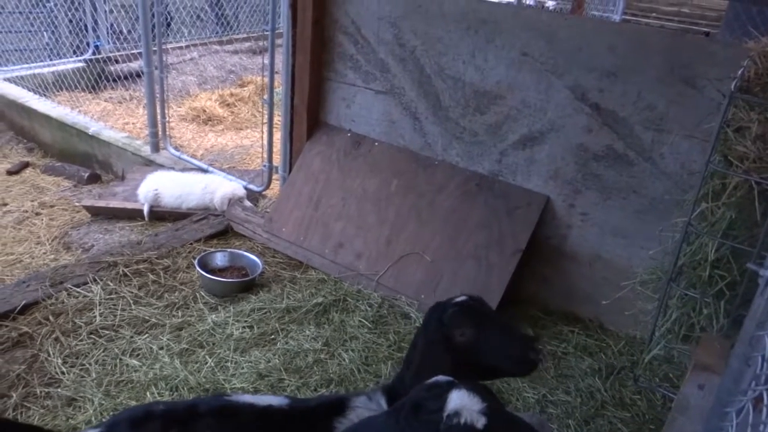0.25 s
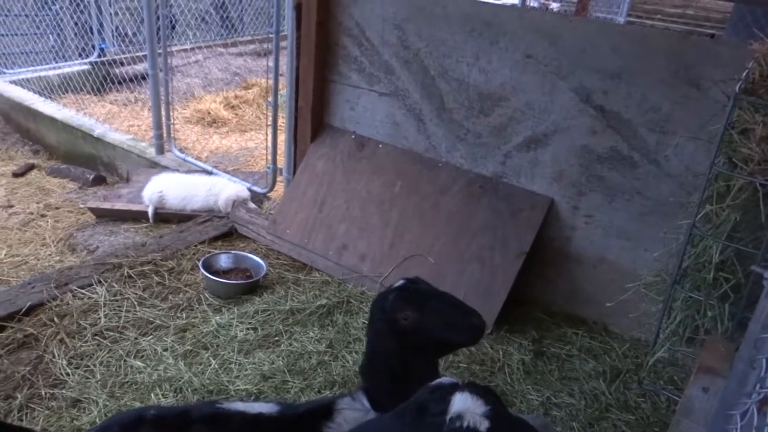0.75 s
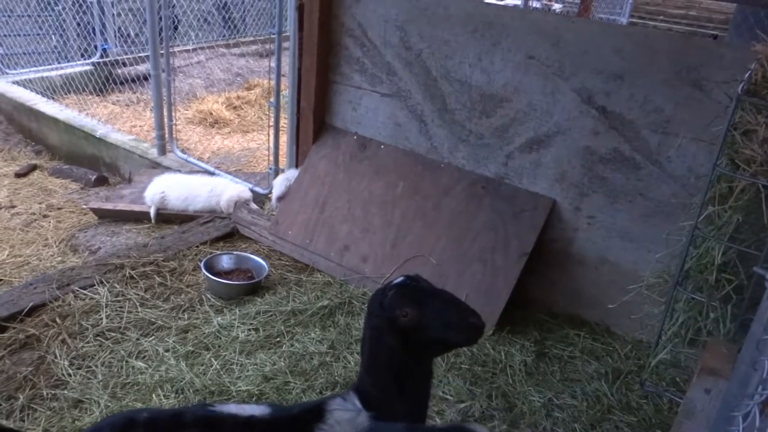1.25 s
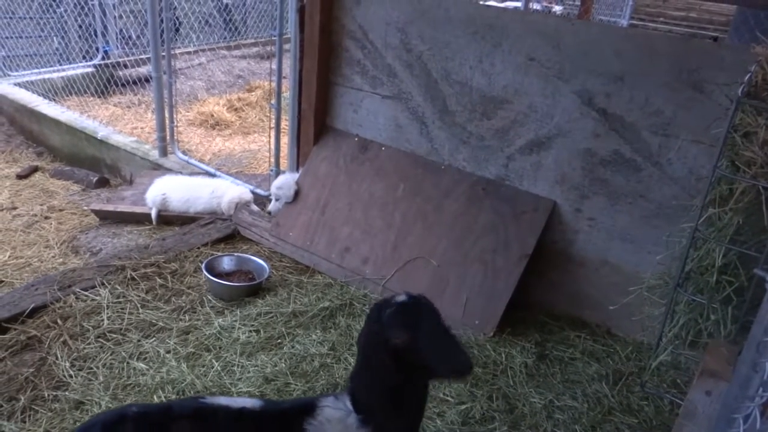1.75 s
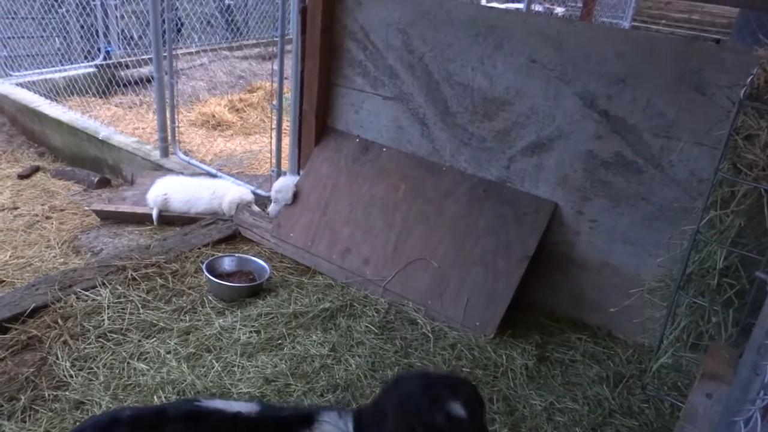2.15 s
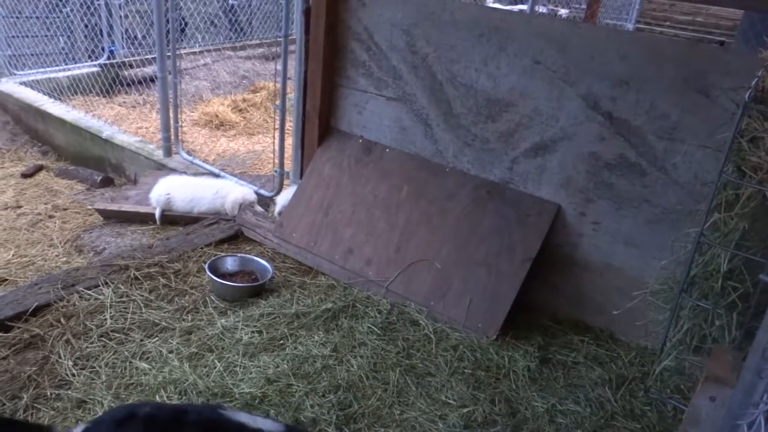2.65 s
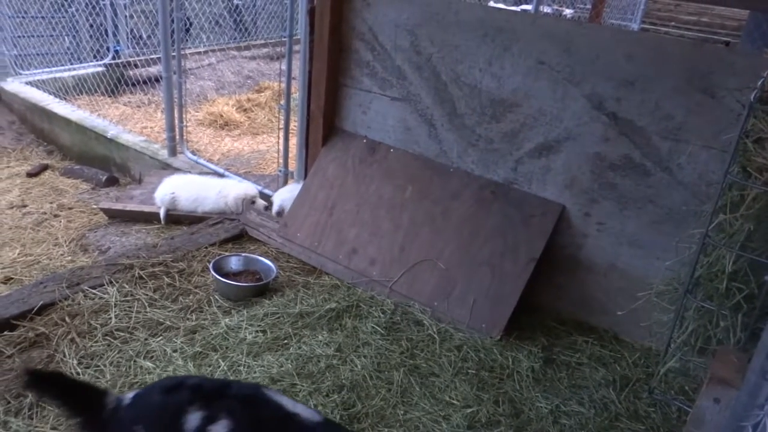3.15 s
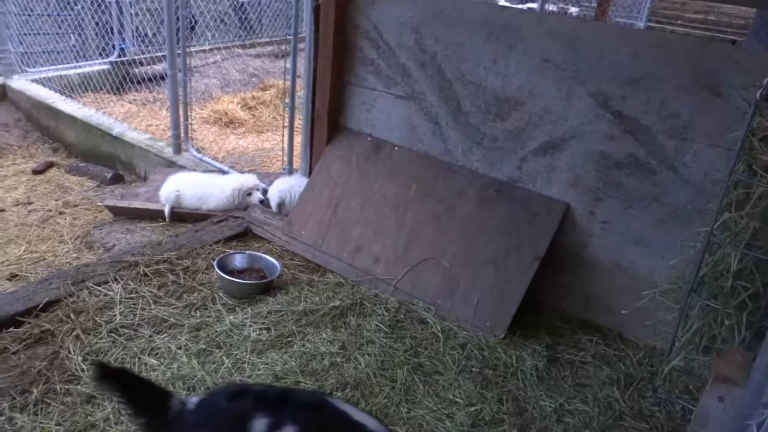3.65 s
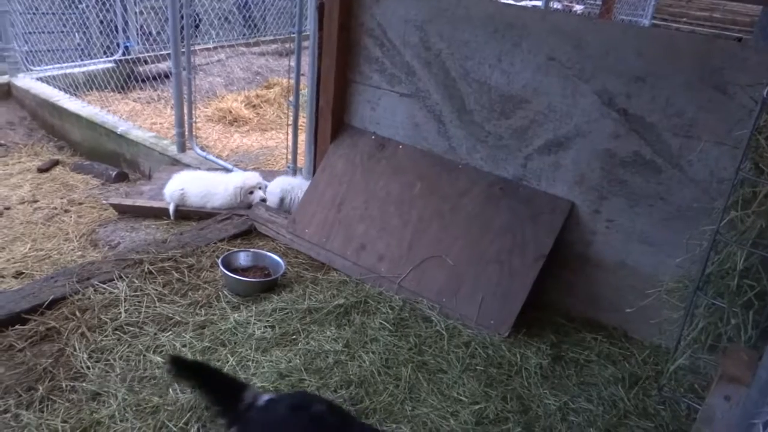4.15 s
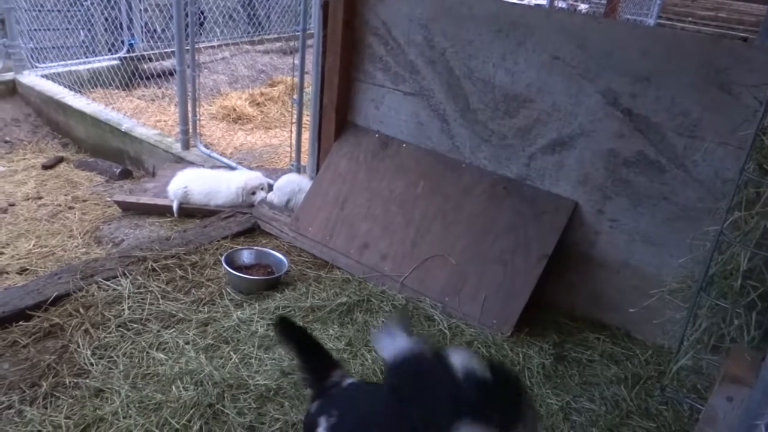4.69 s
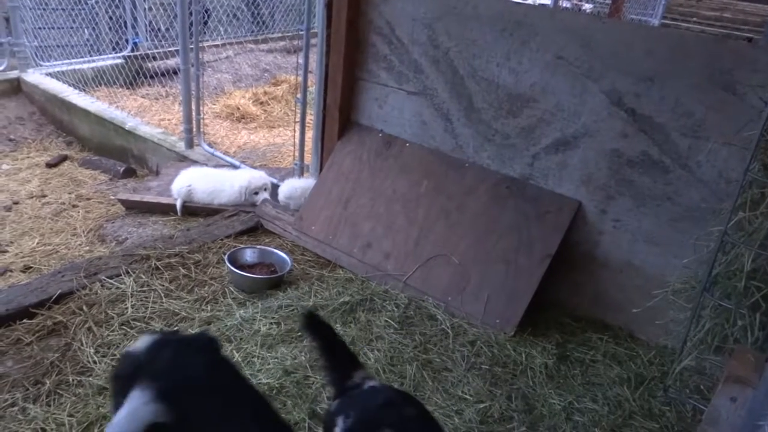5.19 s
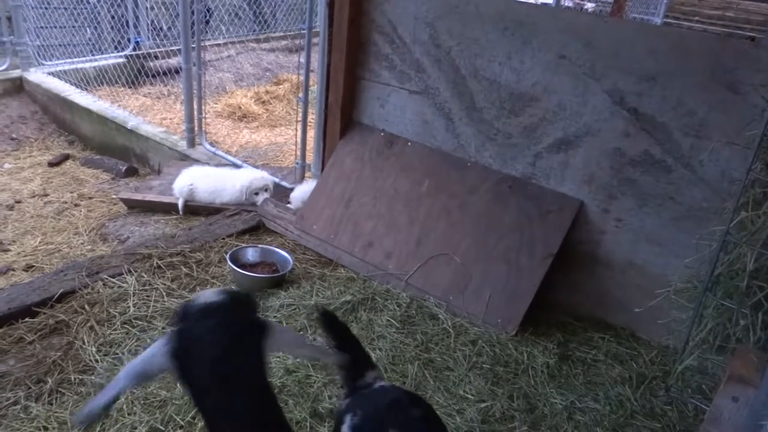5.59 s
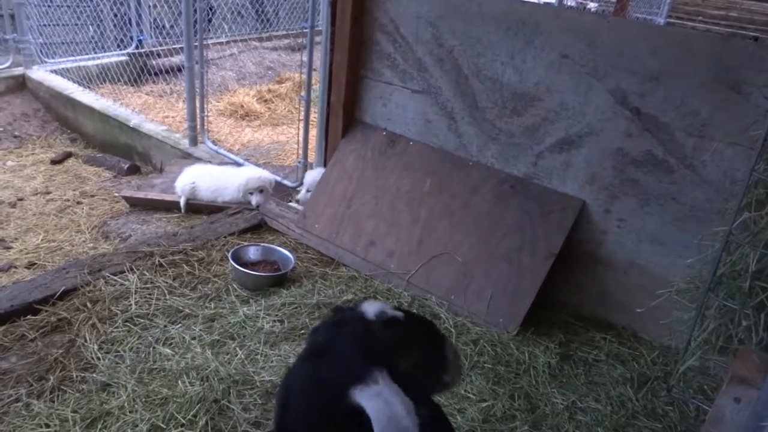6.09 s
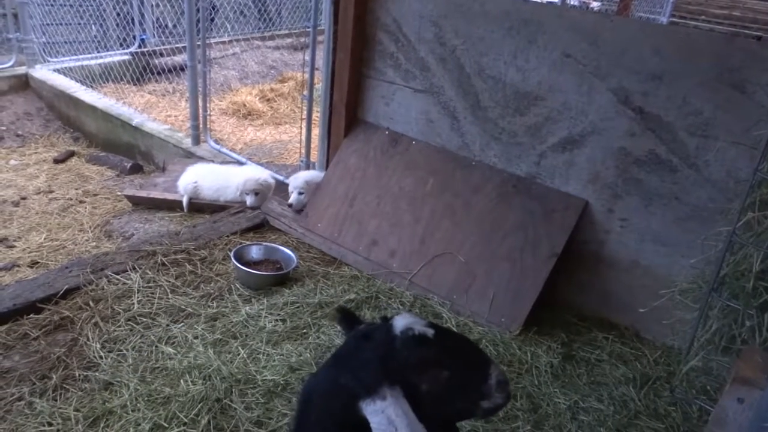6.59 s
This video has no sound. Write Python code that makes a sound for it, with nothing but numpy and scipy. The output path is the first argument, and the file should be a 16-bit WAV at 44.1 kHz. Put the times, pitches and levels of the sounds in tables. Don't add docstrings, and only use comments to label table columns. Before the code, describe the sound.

Quiet rustling bedding and hissing air lead into a muted puppy woof, then a burst of three raspy, breathy barks. Feet scuff the straw, metal clinks lightly, and the puppy barks twice again. One goat bleats, its voice cracking and falling at the end. Faint animal murmurs and short wooden-barn echoes surround it all, picked up in stereo by a small microphone with dull top end.

```python
import sys
import numpy as np
from scipy import signal
from scipy.fft import rfft, irfft, next_fast_len
from scipy.io import wavfile
from scipy.ndimage import uniform_filter1d

SR = 44100
rng = np.random.default_rng(int(sys.argv[2]) if len(sys.argv) > 2 else 0)


def materialize(psi):
    bounded = np.clip(np.atleast_2d(psi).T, -1, 1)
    quanta = np.round(bounded * 32767).astype(np.int16)
    wavfile.write(sys.argv[1], SR, quanta)


def natural_amplitude(level_db):
    exponent = np.asarray(level_db, float) / 20
    return 10 ** exponent


N = 301203

# t/s, depth/dB, half-width/s
CATCHES = [(2.183, 8, 0.0042), (2.206, 7, 0.0012), (2.362, 21, 0.0037), (2.645, 5, 0.0022),
           (2.707, 21, 0.0034), (4.146, 22, 0.0031), (4.168, 18, 0.01), (4.24, 12, 0.0042),
           (4.44, 20, 0.012), (4.53, 22, 0.0063)]
# f/Hz, width/Hz, level/dB
MOUTH = [(509, 30, -1), (574, 20, -0.5), (631.3, 15, 0), (685.5, 18, 0.5), (780, 50, -3), (930, 40, -11)]
RASP = [(1035, 30, 2.5), (1130, 45, 4), (1310, 60, -7), (950, 170, -8), (1750, 450, -6)]
CHEST = [(245, 46, -7), (293, 31, -0.5), (367.4, 15, 4.5)]
# f/Hz, width/Hz, level/dB
EDGE = [(1530, 110, 9), (1830, 40, 8.5), (2056, 27, 6), (2515, 100, 0.5), (2650, 260, -4), (3240, 64, -3.5),
        (3430, 49, -9), (4710, 76, -1), (5090, 350, -4.5), (6750, 640, -2.5)]


def puppy():
    hz, whistle_hz, (throat_db, mouth_db, rasp_db, chest_db) = bark_controls()
    phase = wavering(hz, jitter=0.0258, rate=38.9)
    voiced = np.clip((throat_db + 35.5) / 14, .1, 1)

    tone = np.sqrt(2) * np.sin(phase) * natural_amplitude(1.04 * drift(26))
    hoarse = resonate(rng.standard_normal(N), [(378.0, 96.5, -4.5), (424.8, 58, 0), (468.0, 33.4, -7.5)])
    throat = 0.83 * voiced * tone + (.95 - 0.59 * voiced) * hoarse
    voice = natural_amplitude(throat_db - 1.0 - dips_db(CATCHES)) * throat

    puffs = (1 + .6 * np.cos(phase)) * natural_amplitude(2 * drift(90))
    air = rng.standard_normal((3, N)) * puffs
    whistle_flutter_db = np.clip(4.0 * drift(25), -20, 4)
    whistle = np.sqrt(2) * np.sin(wavering(whistle_hz, jitter=.02, rate=40)) * natural_amplitude(whistle_flutter_db)
    voice = voice + natural_amplitude(mouth_db - 1.5) * (resonate(air[0], MOUTH) + 0.75 * voiced * whistle)

    edge_db = .5 * (rasp_db + 27.5) - 2.0 + 1.7 * drift(26)
    rasp = resonate(air[1], RASP) + natural_amplitude(edge_db) * resonate(air[0], EDGE)
    rasp = signal.lfilter(*signal.iirnotch(4100, 3.0, SR), rasp)
    voice = voice + natural_amplitude(rasp_db - 2.3) * rasp
    voice = voice + voiced * natural_amplitude(chest_db + 2.5) * resonate(air[2], CHEST)
    return signal.sosfilt(signal.butter(4, 230, "high", fs=SR, output="sos"), voice)


# start t/s, held for/s, throat level/dB, throat f/Hz, mouth opening/dB
BARKS = [
    (.465, 0.17, -37, 399.6, -10.5),
    (2.074, .13, -12.5, 424, 1.5),
    (2.294, 0.14, -12, 431.3, -2),
    (2.586, 0.15, -11, 427.3, -4.5),
    (4.106, 0.12, -11, 427.7, -5.5),
    (4.378, 0.15, -12, 413.2, -7),
]
# level over throat/dB, share of opening, attack/s, share of hold, release/s for 20 dB
THROAT_LAW = (0.17, 0.01, 0.062, 0.93, 0.067)
MOUTH_LAW = (-9.5, 0.51, 0.06, 0.93, 0.2081)
RASP_LAW = (-14, 1.07, 0.05, 0.6138, 0.2139)
CHEST_LAW = (-23.5, -0.23, .03, 1.04, 0.82)
LINGER_DB = (-17.5, -43, -16, -18)


def bark_controls():
    start, held, db, pitch_hz, opening_db = np.transpose(BARKS)
    t = np.arange(N) / SR
    latest = np.clip(np.searchsorted(start, t) - 1, 0, None)
    since = t - start[latest]
    overshoot = 0.0501 * np.exp(-((since - 0.051) / .025) ** 2)
    hz = pitch_hz[latest] * (1 + overshoot)
    start_hz, end_hz, rise_s = 589.6, 682, .11
    whistle_hz = start_hz + (end_hz - start_hz) * np.clip(since / rise_s, 0, 1) ** 2
    levels = []
    for law, linger_db in zip((THROAT_LAW, MOUTH_LAW, RASP_LAW, CHEST_LAW), LINGER_DB):
        over_db, share, attack_s, hold, release_s = law
        part_db = db + over_db + share * opening_db
        bark_db = bursts_db(start, hold * held, part_db, attack_s, release_s)
        tail_db = bursts_db(start, held, part_db + linger_db, attack_s, release_s=0.37)
        levels.append(np.maximum(bark_db, tail_db))
    return hz, whistle_hz, levels


# t/s, f/Hz, level/dB, brightness/dB per octave
BLEAT_HIGH = [(4.805, 563, -62, -5), (4.83, 603, -51, -13), (4.87, 655.4, -46.5, -6.5),
              (4.93, 706, -49, -0.5), (5.004, 725, -45.5, 3), (5.04, 738, -46, 2), (5.126, 706, -41.5, -4),
              (5.2, 712, -36, -1.5), (5.235, 681, -41.5, -13)]
BLEAT_LOW = [(5.226, 630.6, -44, 0), (5.245, 566, -39, -2.5), (5.29, 542, -37.5, 1),
             (5.415, 519.5, -39.5, -2), (5.515, 518, -37.5, -3), (5.55, 541, -37.5, -6),
             (5.67, 533, -40.5, -9), (5.85, 536.5, -39, -8.5), (5.99, 528, -43.5, -10)]
BLEAT_END = [(6.022, 523.3, -44.5, -20), (6.056, 517, -36.5, -18.5), (6.095, 499, -41.5, -14.5),
             (6.147, 447, -48.5, -15), (6.185, 417, -57.5, -19)]
# start t/s, end t/s, breath level/dB, half-pitch share
BREAKS = [
    (5.06, 5.155, -50, .5),
    (5.13, 5.222, -58, .4),
    (5.222, 5.265, -43, .2),
    (6.07, 6.17, -59, 0),
]
# t/s, depth/dB, half-width/s
WOBBLES = [(5.376, 7, .005), (5.484, 15, .006), (5.524, 14, .005), (5.545, 10, .006)]
# f/Hz, level/dB
GOAT_MOUTH = [(520, -9.5), (720, -2), (1070, 0.2), (1570, -2.5), (2150, 0.4), (2900, -3), (3450, -16),
              (4300, -19.5)]
# f/Hz, half-width/Hz, level/dB
GOAT_NOSE = [(1037.4, 11, -15), (1336, 52, -18), (1620, 22, -4), (2083, 19.5, 11.5), (2680, 20, -10.5)]


def bleat(rows):
    gate, (hz, effort_db, bright_db) = in_time(rows, fade_s=0.018)
    phase = wavering(uniform_filter1d(hz, size=200), jitter=0.00364, rate=30.3)
    half = sum(share * window(start, end, 0.012) for start, end, db, share in BREAKS)
    skipped = half * natural_amplitude(3.8 * drift(30)) * np.cos(phase / 2)
    wobble_db = dips_db(WOBBLES)
    voice, on = np.zeros(N), gate > 0
    for k in range(8):
        partial_hz = (k + 1) * hz[on]
        mouth_db = at_hz(GOAT_MOUTH, partial_hz)
        mouth_db = mouth_db - np.clip(partial_hz - 4500, 0, None) / 30
        nose_db = sum(db * np.exp(-((partial_hz - at) / width) ** 2) for at, width, db in GOAT_NOSE)
        tilt_db = bright_db[on] * np.log2(np.maximum(partial_hz / 1070, 1))
        flutter_db = (.6 + .5 * k) * drift(22)
        level_db = (effort_db - wobble_db * (k >= 3))[on] + tilt_db + mouth_db + nose_db + 2.5
        level = natural_amplitude(uniform_filter1d(level_db, size=400) + flutter_db[on])
        level = level * (1 + skipped[on] * (k >= 2))
        voice[on] += level * np.sin((k + 1) * phase[on] + k * k)
    return gate * voice


# f/Hz, width/Hz, level/dB
BREATH = [(1730, 410, -5), (2520, 1700, 7), (2780, 2200, 6.5)]


def goat_breath():
    effort = sum(natural_amplitude(db) * window(start, end, 0.0058) for start, end, db, share in BREAKS)
    air = resonate(resonate(rng.standard_normal(N), BREATH), [(2220, 2000, 0)])
    return effort * natural_amplitude(drift(60.7)) * air


# t/s, level/dB
CLINKS = [
    (.82, -51),
    (3.865, -45.5),
    (4.008, -38),
    (4.03, -66),
]
# f/Hz, level/dB, time to fall 60 dB/s
LATCH = [(617, -9, 1), (1385, -3, 0.25), (972, -19.5, 0.2), (2680, -16, 0.06), (4500, -10.5, 0.11),
         (5330, -13, 0.075)]


def gate_metal():
    at, out = [round(s * SR) for s, db in CLINKS], np.zeros(N)
    for hz, level_db, t60 in LATCH:
        clicks = np.zeros(N)
        clicks[at] = natural_amplitude(np.array(CLINKS)[:, 1] + level_db + rng.normal(0, 1.3, len(at)))
        out += ring(clicks, hz, t60)
    return signal.sosfilt(signal.butter(2, 7000, fs=SR, output="sos"), out)


# start t/s, end t/s, f/Hz, width/Hz, level/dB
MURMURS = [(0.522, .63, 235, 32, -40.5), (0.756, .81, 610, 39, -52), (2.0, 2.07, 405, 60, -52.5),
           (2.187, 2.602, 218, 27, -44), (2.36, 3.14, 160, 23, -56), (2.748, 3.439, 438.6, 19, -51),
           (2.95, 3.398, 655, 47, -58), (3.994, 4.41, 1330, 27, -72), (4.327, 4.8, 205.7, 16, -44),
           (4.7, 5.2, 513, 260, -51.5), (0.817, 0.902, 8650, 100, -47), (.524, .64, 2170, 440, -60),
           (6.73, 6.86, 1183, 26, -64)]


def murmurs():
    out = np.zeros(N)
    for start, end, hz, width, db in MURMURS:
        swell = window(start, end, 0.0091)
        on = swell > 0
        narrow = resonate(rng.standard_normal(SR), [(hz, width, 0)])
        narrow = resonate(narrow, [(hz, 2 * width, 0)])
        out[on] += natural_amplitude(db) * swell[on] * narrow[SR - np.sum(on):]
    return out


# start t/s, held for/s, level/dB
STRAW = [(.085, .06, -61), (.28, 0.028, -57.5), (.45, 0.11, -53), (.675, 0.057, -51.5),
         (0.806, 0.11, -42.5), (.97, 0.35, -47.5), (1.533, 0.023, -47), (1.71, .03, -68), (1.85, 0.1, -55),
         (2.004, 0.066, -48.5), (2.09, 0.044, -42), (2.3, 0.1, -50.5), (2.59, 0.083, -50),
         (2.975, 0.64, -54), (2.74, 0.18, -58), (3.535, 0.049, -50), (3.63, .2, -57), (3.849, 0.06, -45.5),
         (3.968, 0.033, -44), (4.129, 0.2, -52), (4.46, 0.16, -47), (4.62, 0.25, -51), (4.95, 0.11, -62),
         (5.08, 0.37, -52.5), (5.4, 0.074, -47), (5.719, 0.045, -53.5), (6.01, 0.039, -56),
         (6.164, 0.11, -47.5), (6.33, 0.28, -50), (6.682, 0.045, -51.5)]
# f/Hz, level/dB per Hz
STRAW_COLOUR = [(1350, -45), (2300, -9.5), (2570, -6.5), (2930, -11.5), (3170, -10), (5840, -5), (8720, -2),
                (10500, -6), (11000, -31), (14400, -50.5), (22000, -120)]


def straw_crackle():
    level_db = bursts_db(*np.transpose(STRAW), attack_s=0.022, release_s=0.19)
    level_db = np.maximum(-64.5, level_db)
    straw = natural_amplitude(level_db - 0.8) * banded(STRAW_COLOUR, patchy_db=2.5, grain_db=-2.0, per_octave=3)
    return straw * natural_amplitude([[-.6], [.6]])


# start t/s, held for/s, shuffle level/dB, thud level/dB
SHUFFLE = [(.42, .3, -63, -61), (0.726, 0.21, -55, -52.5), (.9, 0.24, -58.5, -59), (1.55, 0.051, -63, -70),
           (1.99, .9, -61.5, -56.5), (2.964, 0.2, -45, -49), (3.22, 0.18, -56.5, -56),
           (3.358, 0.059, -50, -49), (3.47, 0.18, -62, -58), (3.85, 0.072, -52.5, -59),
           (3.978, 0.04, -42.5, -53.5), (4.08, 0.754, -58, -48.5), (4.95, 1.236, -56.5, -62.5),
           (6.22, .7, -62.5, -63.5)]
# f/Hz, level/dB per Hz
SHUFFLE_COLOUR = [(470, -21), (800, -6.5), (1030, 17), (1480, -8), (1840, 10.5), (2740, -5), (4000, -7.5),
                  (5200, -16), (8800, -120)]
THUD_COLOUR = [(88, -32.5), (150, -10), (281, 2), (459, -5), (592, -3), (846, -13), (1000, -28),
               (1300, -46.5), (2200, -120)]


def shuffling():
    start, held, rub_db, tread_db = np.transpose(SHUFFLE)
    attack_s, release_s = 0.042, 0.11
    rub_db = np.maximum(-69, bursts_db(start, held, rub_db, attack_s, release_s))
    thud_db = np.maximum(-66, bursts_db(start, held, tread_db, attack_s, release_s))
    rub = natural_amplitude(rub_db + 0.2) * banded(SHUFFLE_COLOUR, patchy_db=2.0, grain_db=0.5)
    thuds = natural_amplitude(thud_db + 4.5) * banded(THUD_COLOUR, patchy_db=3.5, grain_db=-0.7)
    return rub + thuds


# t/s, swell/dB, half-width/s
GUSTS = [
    (.6, 7.5, 0.037),
    (2.65, 5.5, 0.95),
    (3.33, 2, .12),
    (4.1, 4, .3),
    (4.72, 9, 0.11),
]
# f/Hz, level/dB per Hz
RUMBLE = [(12, -43.5), (20, -2.5), (54, -7.5), (124, 0), (200, -7.5), (260, -18.5), (440, -120)]
HISS = [(120, -37.5), (200, 10.5), (253, -1.5), (658, -4), (1520, -16.5), (6020, -13), (8000, -5.5),
        (11000, -19), (14300, -50), (22000, -120)]


def barn_air():
    rumble = natural_amplitude(-59 - 3.0 + dips_db(GUSTS)) * banded(RUMBLE, patchy_db=3.0, grain_db=3.0)
    hiss = natural_amplitude(-57 - 2.0) * banded(HISS, patchy_db=2.0, grain_db=0.5)
    return rumble + hiss


def barn(x):
    t60_s, wall_cut_hz = 0.27, 9000
    size = next_fast_len(N + SR)
    hz, spectrum = np.arange(size // 2 + 1) * SR / size, rfft(x, size)
    dull, out = 1 / (1 + 1j * hz / wall_cut_hz), np.zeros((2, size // 2 + 1), complex)
    for k, lag in enumerate(rng.uniform(.012, .04, 16)):
        loop = natural_amplitude(-60 * lag / t60_s) * dull * np.exp(-2j * np.pi * hz * lag)
        out[k % 2] += loop / (1 - loop) * (-1) ** (k // 2)
    return irfft(out * spectrum, size)[:, :N]


# f/Hz, likeness 0 to 1
LIKENESS = [(60, 0.96), (170, 0.96), (480, 0.8), (1340, 0.48), (3760, 0.76), (10600, 0.86)]


def banded(spectrum, patchy_db, grain_db, per_octave=2):
    low_hz, high_hz = spectrum[1][0] * .7, min(spectrum[-2][0], 12000)
    edges = np.geomspace(low_hz, high_hz, int(per_octave * np.log2(high_hz / low_hz)) + 2)
    white = rng.standard_normal((2, 2, N)) * natural_amplitude(grain_db * drift(210))
    out = 0
    for k, (low, high) in enumerate(zip(edges, edges[1:])):
        band = signal.butter(2, [low, high], "band", fs=SR, output="sos")
        mid, side = signal.sosfilt(band, white[k % 2])
        hz = np.sqrt(low * high)
        alike = np.clip(at_hz(LIKENESS, hz) - .03, 0, 1)
        gain = natural_amplitude(at_hz(spectrum, hz) + patchy_db * drift(8.5))
        out = out + gain * (np.sqrt(1 + alike) * mid + np.sqrt(1 - alike) * side * [[1], [-1]])
    return rms_one(out)


def resonate(x, peaks):
    out = 0
    for k, (hz, width, level_db) in enumerate(peaks):
        r = np.exp(-np.pi * width / SR)
        poles = [1, -2 * r * np.cos(2 * np.pi * hz / SR), r * r]
        peak = signal.lfilter([1 - r * r, 0, r * r - 1], poles, x)
        out = out + (-1) ** k * natural_amplitude(level_db) / np.sqrt(width) * peak
    return rms_one(out)


def ring(x, hz, t60):
    r, w = natural_amplitude(-60 / (t60 * SR)), 2 * np.pi * hz / SR
    return signal.lfilter([0, np.sin(w)], [1, -2 * r * np.cos(w), r * r], x + 1e-18)


def wavering(hz, jitter, rate):
    return 2 * np.pi * np.cumsum(hz * (1 + jitter * drift(rate))) / SR


def drift(rate):
    r = np.exp(-80 * np.pi * rate / SR)
    slow = signal.lfilter([1], [1, -2 * r, r * r], rng.standard_normal(N // 40 + 2002))[2000:]
    return np.interp(np.arange(N) / 40, np.arange(len(slow)), rms_one(slow))


def bursts_db(start, held, db, attack_s, release_s):
    since = np.arange(0, N + 32, 32)[:, None] / SR - start
    rise_db = 24 * np.log10(np.clip(since / attack_s, 1e-5, 1))
    fall_db = 20 * np.clip(since - held, 0, None) / release_s
    loudest = np.max(db + rise_db - fall_db, axis=1)
    return np.interp(np.arange(N) / 32, np.arange(len(loudest)), loudest)


def dips_db(table):
    t = np.arange(N) / SR
    return sum(depth_db * np.exp(-((t - s) / width) ** 2) for s, depth_db, width in table)


def window(start, end, fade_s):
    t = np.arange(N) / SR
    return np.clip(np.minimum(t - start, end - t) / fade_s, 0, 1)


def in_time(rows, fade_s):
    t, (s, *columns) = np.arange(N) / SR, np.transpose(rows)
    gate = np.clip(np.minimum(t - s[0], s[-1] - t) / fade_s + 1, 0, 1)
    return gate, [np.interp(t, s, c) for c in columns]


def at_hz(points, hz):
    point_hz, value = np.transpose(points)
    return np.interp(np.log(hz), np.log(point_hz), value)


def rms_one(x):
    return x / np.sqrt(np.mean(x ** 2) + 1e-20)


def scene():
    dog = puppy()
    goat = bleat(BLEAT_HIGH) + bleat(BLEAT_LOW + BLEAT_END) + goat_breath()
    small = gate_metal() + murmurs()
    direct = dog * natural_amplitude([[-1.2], [1.2]]) + goat * natural_amplitude([[-.9], [.9]]) + small * natural_amplitude([[.4], [-.4]])
    echoes = barn(natural_amplitude(-20) * (dog + small) + natural_amplitude(-13) * goat)
    return direct + echoes + straw_crackle() + shuffling() + barn_air()


def top_cut(x):
    return signal.sosfilt(signal.butter(12, 11190, fs=SR, output="sos"), x)


def record(dry):
    rounded = 0.83 * np.tanh(dry / 0.79)
    mix = signal.sosfilt(signal.ellip(10, 1, 60, 11060, fs=SR, output="sos"), rounded)
    return top_cut(mix)


dry = scene()
out = record(dry)
materialize(out)
```